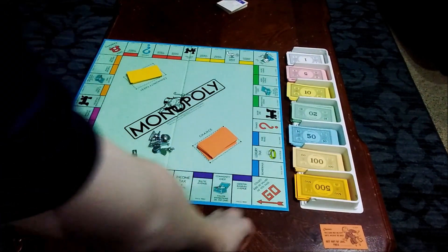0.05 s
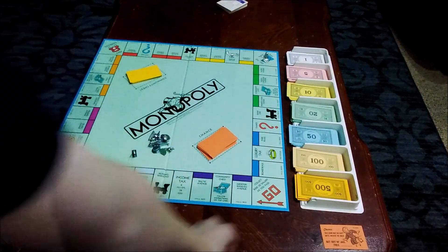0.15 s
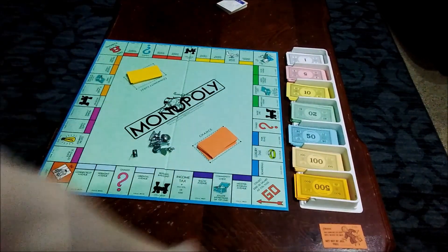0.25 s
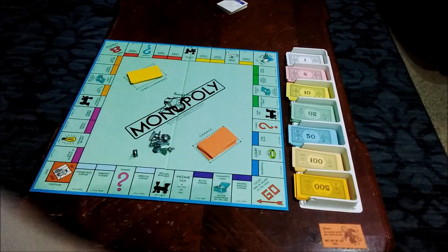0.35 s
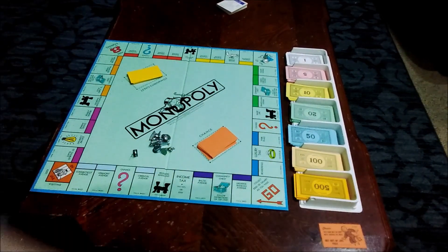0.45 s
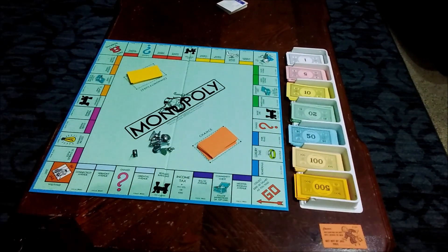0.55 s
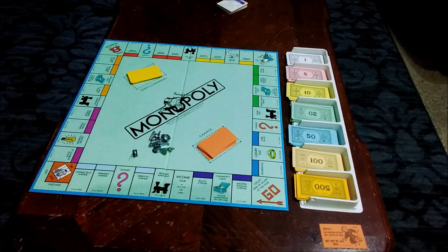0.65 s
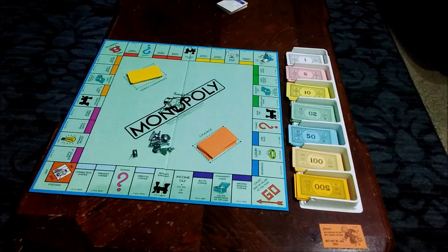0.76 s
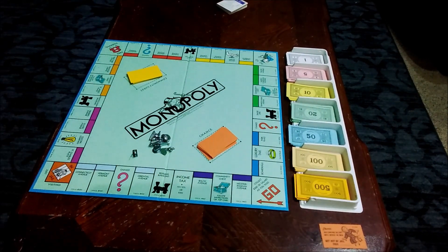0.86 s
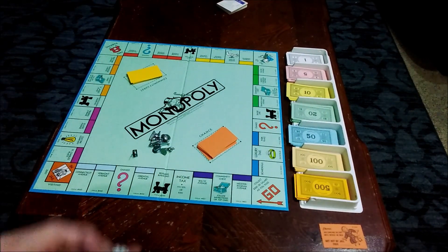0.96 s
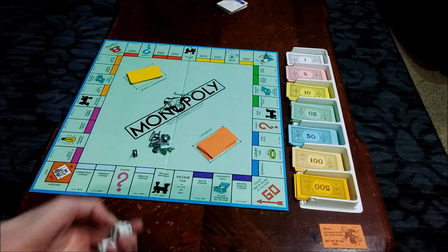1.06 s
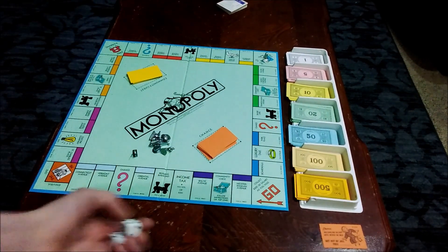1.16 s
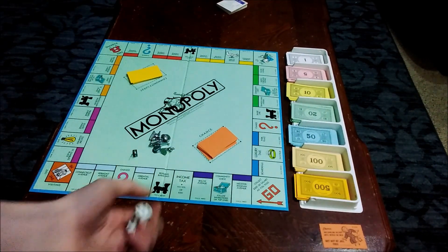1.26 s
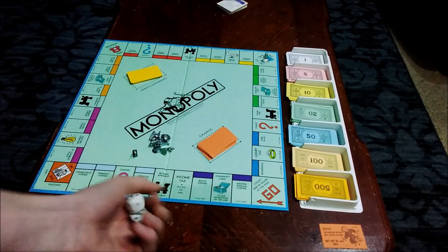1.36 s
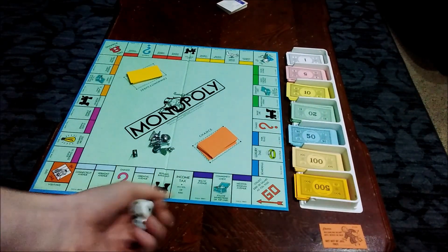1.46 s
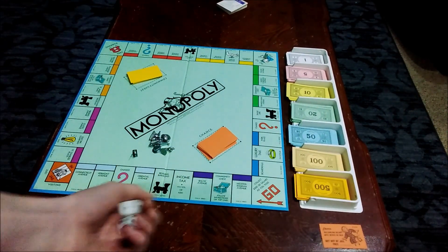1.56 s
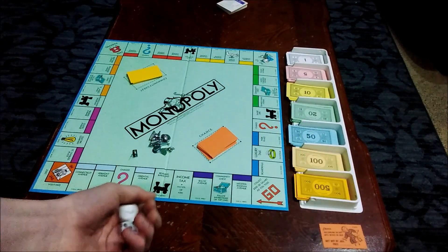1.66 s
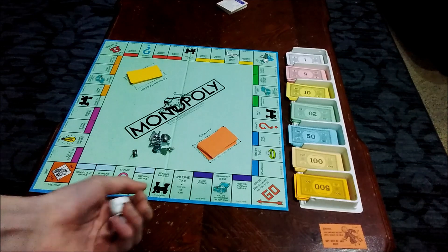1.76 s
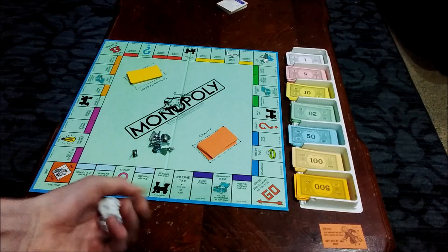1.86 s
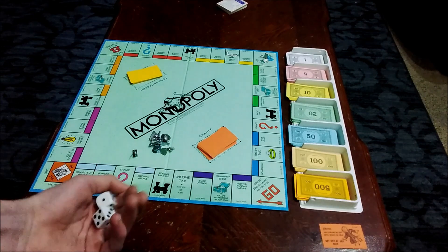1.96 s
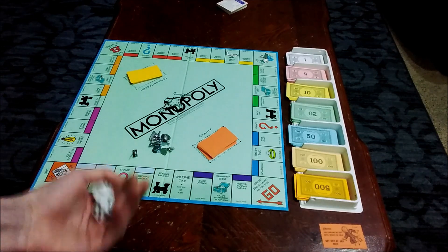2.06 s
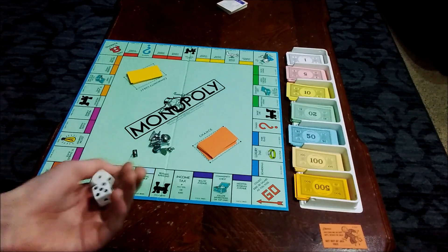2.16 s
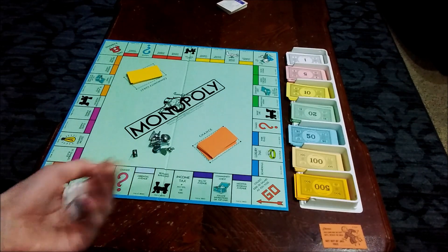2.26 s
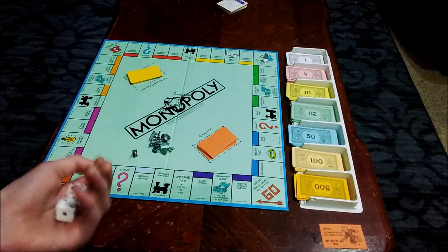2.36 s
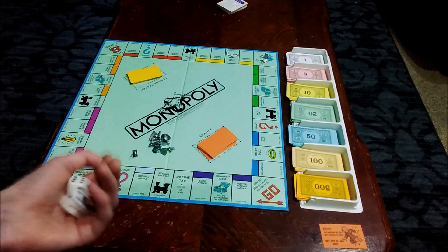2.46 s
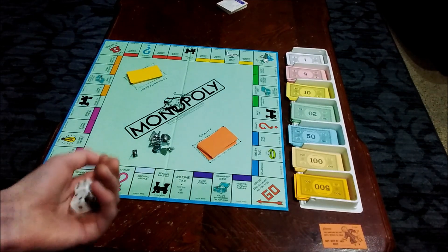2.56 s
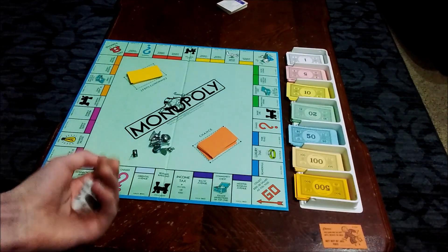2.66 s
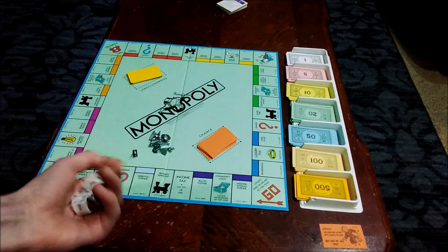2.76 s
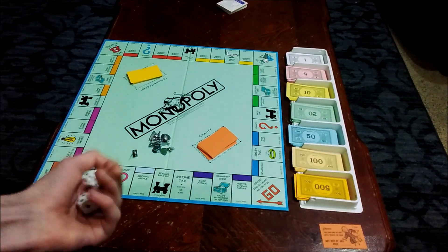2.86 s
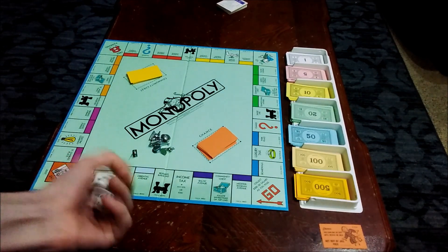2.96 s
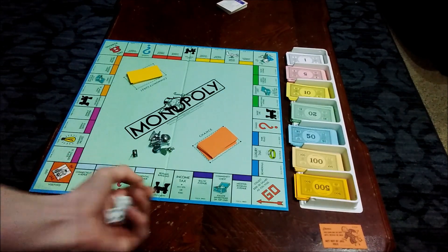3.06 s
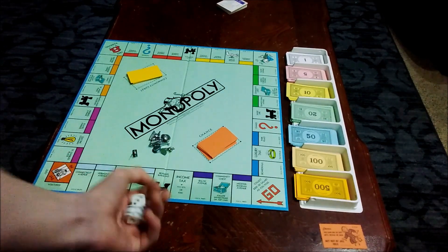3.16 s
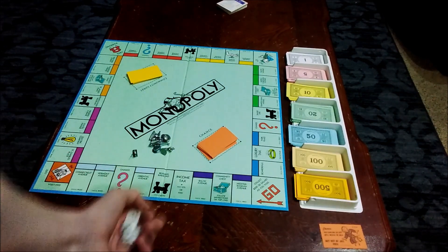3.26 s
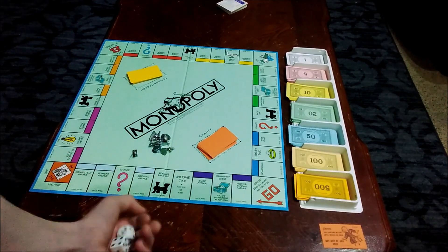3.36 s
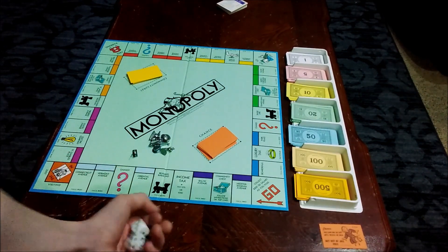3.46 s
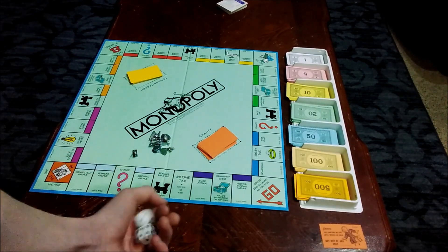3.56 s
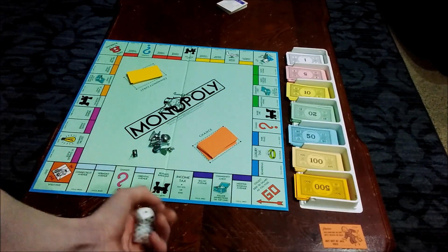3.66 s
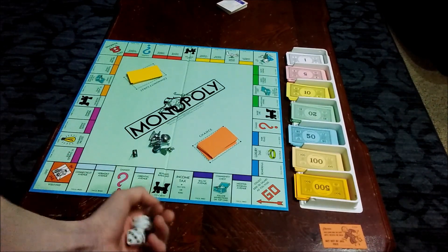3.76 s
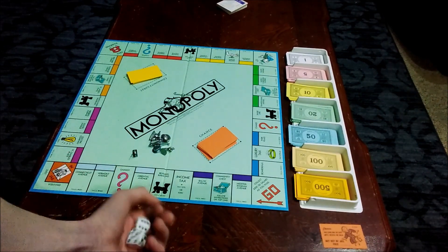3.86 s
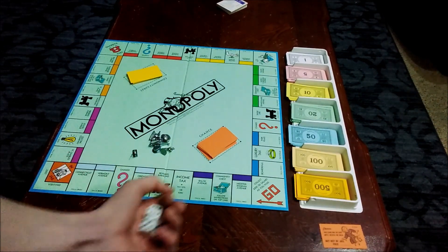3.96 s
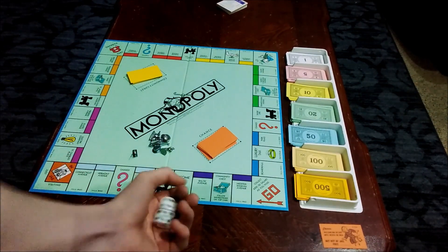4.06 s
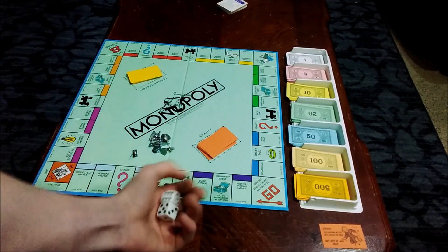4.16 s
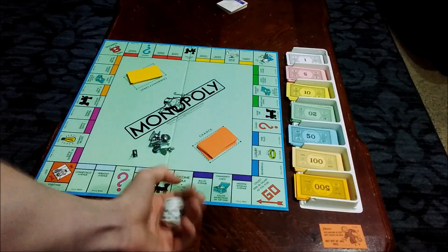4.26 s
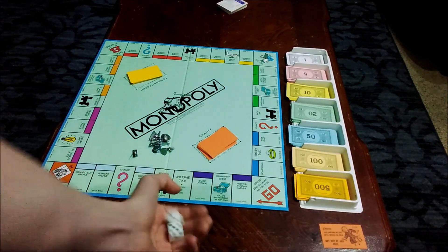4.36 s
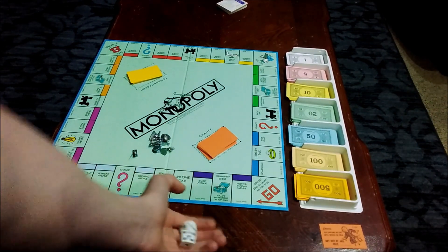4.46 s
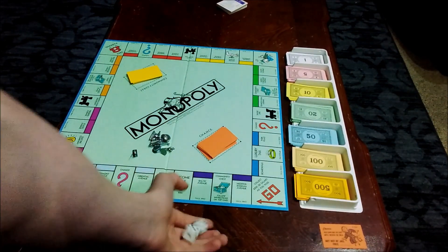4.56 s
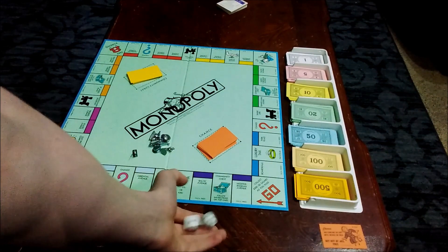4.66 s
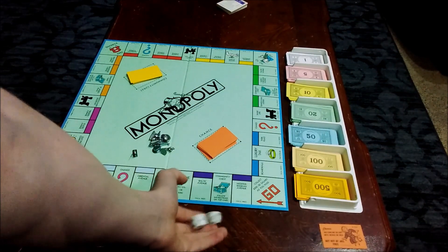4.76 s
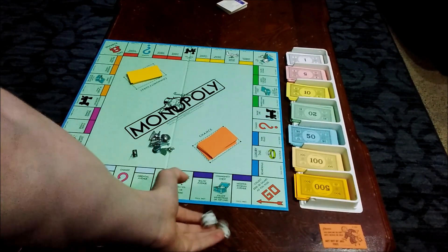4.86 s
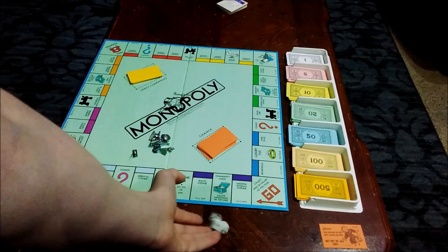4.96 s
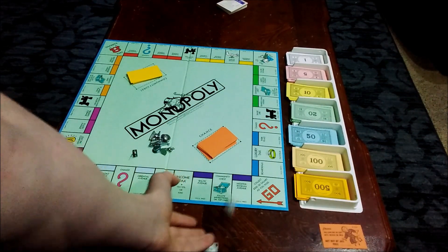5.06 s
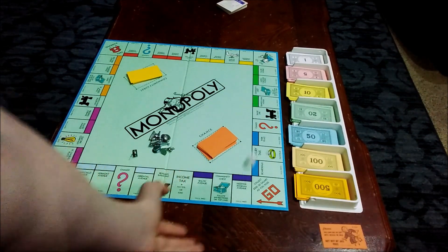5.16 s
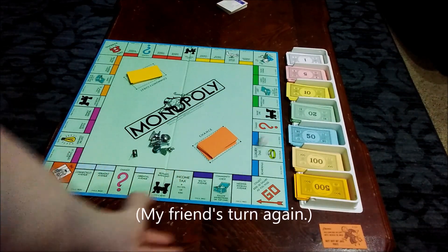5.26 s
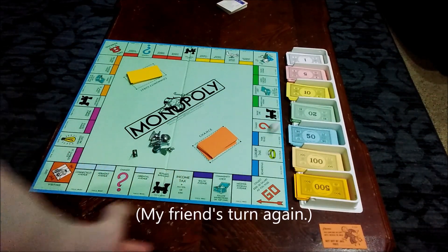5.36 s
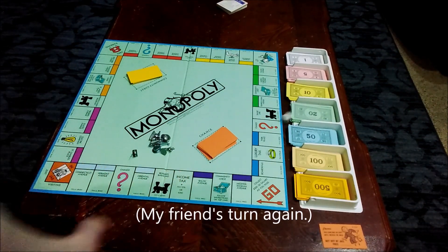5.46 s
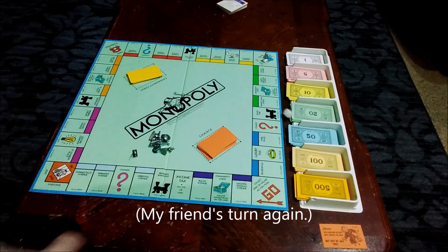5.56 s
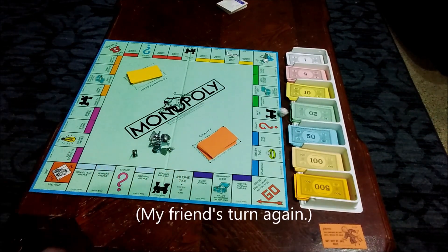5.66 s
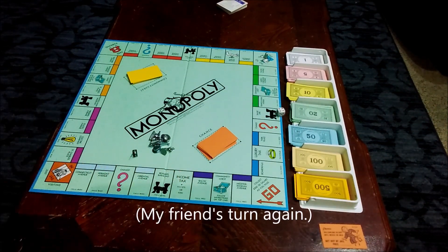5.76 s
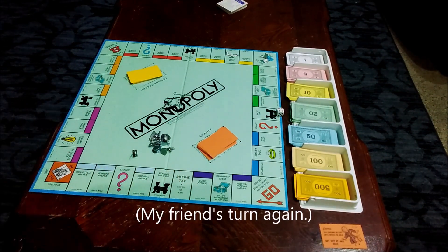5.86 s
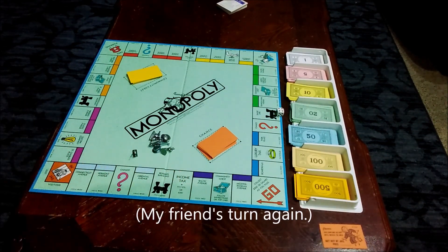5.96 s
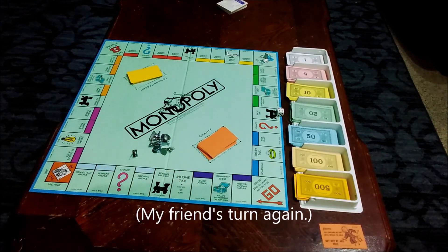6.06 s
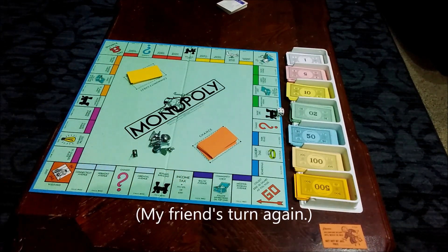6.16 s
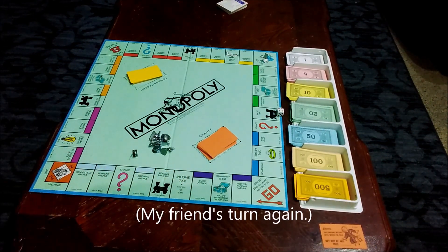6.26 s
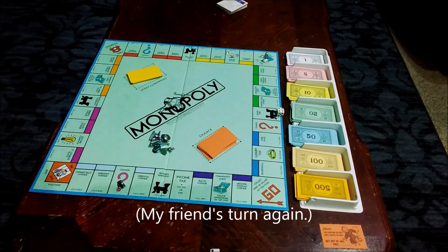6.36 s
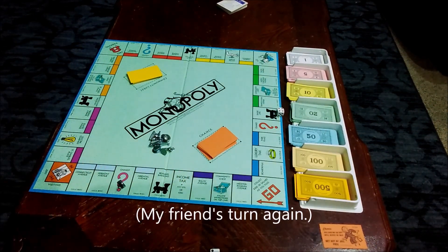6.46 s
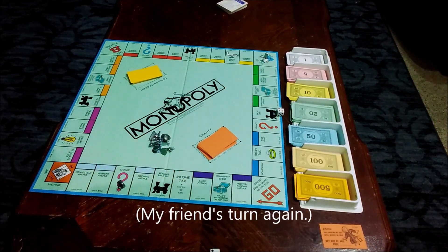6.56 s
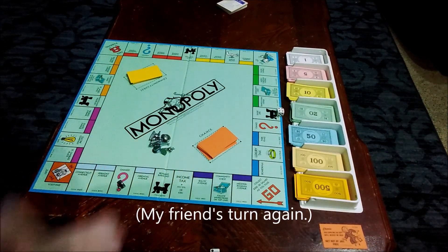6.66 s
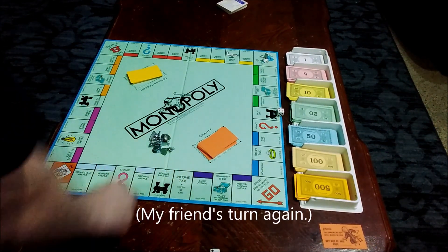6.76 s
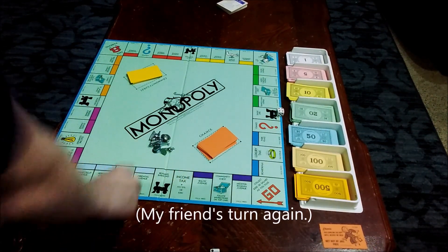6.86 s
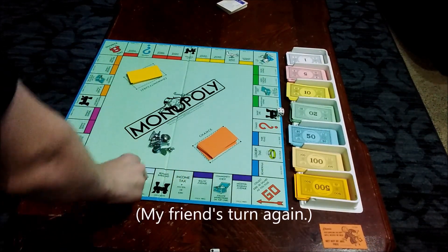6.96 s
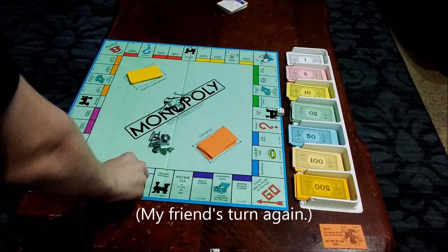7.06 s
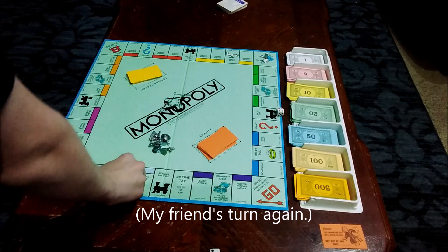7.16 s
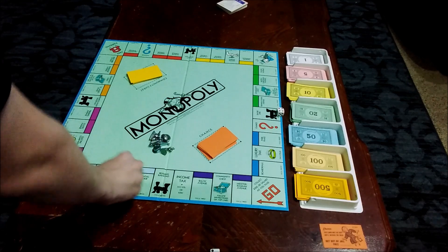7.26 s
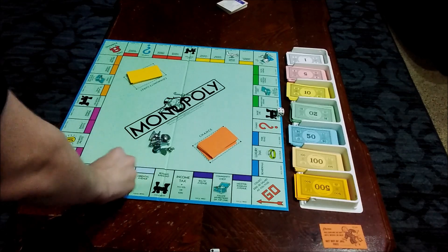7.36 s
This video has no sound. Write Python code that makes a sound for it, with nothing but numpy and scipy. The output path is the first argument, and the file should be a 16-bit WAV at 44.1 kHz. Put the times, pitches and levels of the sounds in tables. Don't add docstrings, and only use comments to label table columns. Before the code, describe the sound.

Two plastic dice click in a shaken hand, then clatter hard across a cardboard game board on a table, followed by soft taps and a faint slide.

```python
import sys
import numpy as np
from scipy import signal
from scipy.fft import rfft, irfft, next_fast_len
from scipy.io import wavfile
from scipy.ndimage import uniform_filter1d, map_coordinates

SR = 44100
rng = np.random.default_rng(int(sys.argv[2]) if len(sys.argv) > 2 else 0)


def field_ratio(decibels):
    return 10 ** (np.asarray(decibels, dtype=float) / 20)


def to_wav(sig):
    pcm = np.clip(np.atleast_2d(sig), -1, 1) * 32767
    pcm = np.round(pcm).astype(np.int16)
    wavfile.write(sys.argv[1], SR, pcm.T)


N = 327222


def add(track, start_s, sound):
    track[round(start_s * SR):][:len(sound)] += sound


def blip(hz, ms):
    u = np.arange(1024) / SR * 1000 / ms
    swell = (u * np.e / 2) ** 2 * np.exp(-u)
    return np.sin(2 * np.pi * hz * u * ms / 1000) * swell


def ring(hz, t60, rise, size=1024):
    t = np.arange(size) / SR
    return np.sin(2 * np.pi * hz * t) * field_ratio(-60 * t / t60) * (1 - np.exp(-t / rise))


def modes(table, size, spread_db):
    total = np.zeros(size)
    for k, (hz, db, t60) in enumerate(table):
        strength = field_ratio(db + spread_db * rng.standard_normal())
        pitch_hz = hz * (1 + 0.054 * rng.standard_normal())
        total += (-1) ** k * strength * ring(pitch_hz, t60, 0.000071, size)
    return total


def band(x, low_hz, high_hz):
    return signal.sosfilt(signal.butter(3, [low_hz, high_hz], "band", fs=SR, output="sos"), x)


def along(points, hz):
    point_hz, value = np.transpose(points)
    return np.interp(np.log(hz + 1), np.log(point_hz + 1), value)


def unit(x):
    return x / np.sqrt(np.mean(x ** 2) + 1e-20)


def noise(spectrum):
    size = next_fast_len(N + 8192)
    hz = np.fft.rfftfreq(size, 1 / SR)
    colour = field_ratio(along(list(spectrum) + [(15850, -120)], hz))
    return unit(irfft(rfft(rng.standard_normal(size)) * colour, size)[:N])


# start_s, level_db, board_pitch_hz, click_db, table_thump_db
BOUNCES = [(4.9367, -4.5, 1690, -9.5, -10), (4.9382, -2.5, 2330, -20.5, -18.5),
           (4.941, -6, 2060, -17.5, -19.5), (4.9982, -23, 2460, -26.5, -27),
           (5.0555, -7.5, 1780, -12, -16.5), (5.0592, -7, 2290, 4.5, -36), (5.0637, -14, 2400, 5.1, -12),
           (5.0727, -7.5, 2070, -5, -17.5), (5.0769, -10, 2650, -12, -16), (5.5088, -24.5, 1900, -24, -25),
           (5.537, -11, 1860, -16.5, -23), (5.5416, -23.5, 2080, -34, -10), (5.6417, -11, 1780, -27, -18),
           (5.6448, -25, 2230, -8.5, -29), (5.6886, -14.5, 1730, -25.5, -19),
           (5.7267, -18, 1820, -27.5, -16), (5.7904, -39, 1900, -11.5, -4)]
# start_s, level_db, click_db
TUMBLES = [(5.1124, -18.5, -14.5), (5.144, -22, -5.5), (5.1591, -22, -4), (5.1774, -17.5, -0.2),
           (5.1785, -20.5, 0.5), (5.1837, -26, -3), (5.2002, -22.5, -6), (5.2027, -20.5, -21),
           (5.2378, -19, -8.5), (5.2424, -23, -9), (5.2574, -21, -22), (5.274, -29, 0),
           (5.2901, -17.5, -22), (5.3485, -18.5, -5), (5.364, -28.5, -14), (5.3973, -36, 2.3),
           (5.401, -26.5, 2), (5.407, -21.5, -11), (5.4362, -23.5, -14), (5.4684, -25, -10),
           (5.472, -24, -33)]
# pitch_hz, level_db, fade_60db_s
BOARD_TONES = [(1050, -2, .012), (1420, -3, .014), (1820, 0, .014), (2250, 0, .014), (3100, -8, .008),
               (4000, -13, .006)]
# pitch_hz, level_db, fade_60db_s
TABLE_TONES = [(151.2, 4.5, 0.16), (222, -5.5, .15), (279, -2, 0.15), (343, 3, 0.085), (467, -2.5, 0.09),
               (600, -3.5, 0.13), (707, -13, 0.24), (905, -2, 0.038)]
EDGE_HZ, EDGE_THUMP_DB = 2210, -20.5
FACE_CLICK_HZ, EDGE_CLICK_HZ = 7600, 6600


def roll():
    out = np.zeros(N + SR)
    spread_db = 2.5
    short_table = [(hz, db, t60 * .5) for hz, db, t60 in TABLE_TONES[1:]]
    landings = [(*row, FACE_CLICK_HZ, 8) for row in BOUNCES]
    for s, db, click_db in TUMBLES:
        board_hz = EDGE_HZ * np.exp(0.18 * rng.standard_normal())
        thump_db = EDGE_THUMP_DB + 4 * rng.standard_normal()
        click_hz = EDGE_CLICK_HZ * np.exp(0.13 * rng.standard_normal())
        landings.append((s, db, board_hz, click_db, thump_db, click_hz, 1))
    for s, db, board_hz, click_db, thump_db, click_hz, clean_db in landings:
        add(out, s, field_ratio(db + thump_db - 9.5) * modes(short_table, size=4096, spread_db=spread_db))
        add(out, s, field_ratio(db - 18) * modes(BOARD_TONES, size=1024, spread_db=spread_db))
        slaps = rng.random((4, 3)) * [.006, 8, 1] + [.0008, clean_db, 0]
        chatter = rng.random((4, 3)) * [.03, 9, 1] + [.006, 14, 0]
        for late, loss_db, pitch in [(0, 0, .5), *slaps, *chatter]:
            knock = blip(board_hz * (.7 + pitch * .5), 0.14) - field_ratio(.95 * click_db - 7) * blip(4500, 0.11)
            upper = field_ratio(.25 * click_db + 1) * (.17 * blip(14500, .06) - .35 * blip(10300, .08))
            click = blip(click_hz * (.92 + .16 * pitch), .13) + upper
            click_gain = field_ratio(click_db + 0.5 - .7 * clean_db * (late > 0))
            add(out, s + late, field_ratio(db - loss_db - 1.5) * (knock + click_gain * click))
    return out[:N]


def plastic(hz):
    corner = np.exp(.06 * rng.standard_normal(2))
    low_ring = 0.22 * ring(7100 * corner[0], 0.0033, .0001)
    high_ring = 0.099 * ring(9800 * corner[1], 0.0072, .0001)
    return blip(hz, 0.055) + low_ring - high_ring


# start_s, level_db, pitch_hz, body_db
CLACKS = [(1.144, -33.5, 8100, -26), (1.174, -29, 8250, -19), (1.309, -34, 9200, -19),
          (1.481, -23.5, 8350, -13), (1.5267, -39.5, 6830, 3.5), (1.557, -30.5, 8550, -13),
          (1.599, -27.5, 7130, -12.5), (2.297, -33.5, 8300, -10), (2.3541, -30, 7540, -16),
          (2.6142, -19, 8600, -45), (2.7086, -28, 7600, -16), (2.713, -34, 6870, -30),
          (2.8603, -30, 6440, -10.5), (2.938, -30.5, 5760, -19), (2.9701, -19.5, 7550, -23),
          (3.002, -30.5, 8200, -17), (3.0409, -20.5, 8940, -20), (3.1018, -14.5, 8000, -19),
          (3.141, -22.5, 7800, -19), (3.6464, -26, 7860, -13), (3.6667, -19.5, 8650, -24),
          (3.7239, -22, 7200, -27), (3.8033, -18.5, 8560, -43), (3.8171, -19.5, 8360, -49),
          (4.1612, -45, 6750, -22), (4.2432, -34, 7800, -26), (4.3536, -30.5, 8800, -12),
          (4.298, -20.5, 8900, -49), (4.3426, -24, 8600, -26), (4.363, -30, 7160, -23)]
# start_s, level_db
MORE_HITS = [(.3473, -53), (.4643, -52.5), (1.177, -36), (1.305, -36), (1.5004, -43), (1.512, -36),
             (1.5337, -35), (1.6248, -40), (2.0924, -40), (2.18, -35), (2.2344, -40.5), (2.2477, -38.5),
             (2.2935, -36), (2.3364, -43), (2.347, -37), (2.7026, -32), (2.95, -37), (3.0134, -38),
             (3.164, -51), (3.368, -45), (3.403, -46), (3.5707, -35), (3.6791, -29.5), (3.6946, -31),
             (3.7033, -44), (3.827, -24), (4.187, -43.5), (4.32, -37), (4.3933, -32), (4.4024, -33)]
TICK_DB, TICK_HZ, HZ_PER_DB = -36.5, 6670, 67
TICK_BODY_DB, BODY_PER_DB = -19.5, -0.55
SETTLE_S, SETTLE_DB, SETTLE_SPREAD_DB = .04, -20, 15


def shake():
    out = np.zeros(N + SR)
    weak_hits = list(MORE_HITS)
    for s, db, *_ in CLACKS:
        for late, loss in rng.random((2, 2)):
            weak_hits.append((s + SETTLE_S * late, db + SETTLE_DB - SETTLE_SPREAD_DB * loss))
    hits = list(CLACKS)
    for s, db in weak_hits:
        extra_db = db - TICK_DB
        hz = TICK_HZ + HZ_PER_DB * extra_db + 600 * rng.standard_normal()
        body_db = TICK_BODY_DB + BODY_PER_DB * extra_db + 4 * rng.standard_normal()
        hits.append((s, db, hz, body_db))
    for s, db, hz, body_db in hits:
        body = blip(2900, .1)
        add(out, s, field_ratio(db + 1.45) * (plastic(hz) - field_ratio(body_db) * body))
        again_s = s + .0002 + .0004 * rng.random()
        add(out, again_s, field_ratio(db - 5.5) * plastic(hz * .9))
    return out[:N]


# start_s, level_db, push_length_ms
TAPS = [
    (5.8812, -13, 0.93),
    (6.533, -33, 0.4),
]


def taps():
    out = np.zeros(N + SR)
    for s, db, ms in TAPS:
        u = np.arange(1024) / SR / (ms * 0.00042)
        push = u * u * (1.5 - u) * np.exp(-2 * u)
        add(out, s, field_ratio(db + 17.0) * push)
        add(out, s, field_ratio(db - 21) * ms ** 2 * modes(TABLE_TONES, size=16384, spread_db=1))
    return out[:N]


# middle_s, half_length_s, level_db
SCUFFS = [
    (0.045, 0.092, -71.5),
    (7.186, 0.0042, -62),
    (7.205, 0.0076, -53.5),
    (7.23, 0.0098, -63.5),
    (7.268, 0.027, -74),
]
# pitch_hz, level_db_per_hz
SCUFF_COLOUR = [(500, -37), (1000, -2.5), (1600, 2), (2300, -1.5), (3200, -25), (6000, -48)]


def slides():
    t = np.arange(N) / SR
    puffs = sum(field_ratio(db) * np.exp(-((t - s) / half_s) ** 2) for s, half_s, db in SCUFFS)
    return noise(SCUFF_COLOUR) * puffs


# delay_s, level_db
ECHOES = [(.0012, -13), (.0117, -12), (.0129, -19), (.0212, -22), (.0325, -26)]
# pitch_hz, fade_60db_s
ROOM_FADE = [(150, 0.52), (500, 0.53), (2000, 0.49), (5000, 0.59), (8000, 0.36), (14000, .18)]


def room(x, tail_db, low_hz):
    out = x + sum(field_ratio(db) * np.pad(x, (round(s * SR), 0))[:N] for s, db in ECHOES)
    x = band(x, low_hz, 16000)
    moment = np.arange(N) / 2200
    for k in range(5):
        share = np.clip(1 - abs((moment - k + 2.5) % 5 - 2.5), 0, 1)
        hz, t, z = signal.stft(rng.standard_normal(SR // 2), SR, nperseg=256)
        fade = field_ratio(-60 * t / along(ROOM_FADE, hz)[:, None])
        tail = signal.istft(z * fade, SR, nperseg=256)[1]
        tail = tail * (1 - np.exp(-np.arange(len(tail)) / SR / 0.003))
        out = out + field_ratio(tail_db) * signal.fftconvolve(x * share, tail / np.linalg.norm(tail))[:N]
    return out


# pitch_hz, level_db_per_hz
RUMBLE = [(8.8, -35), (15, 1.5), (123, -13.5), (240, -17), (570, -22), (1500, -31.5), (1950, -67),
          (3300, -120)]
# pitch_hz, level_db_per_hz
HISS = [(590, -40), (1000, -5.5), (1520, -5), (1890, -2.5), (2310, -5), (4890, -8.5), (15750, -9)]
# pitch_hz, level_over_rumble_db
HUM = [(120, -4.5), (238, -14.5)]
# time_s, level_db
FADE_IN = [(0, -7.5), (.2, -8), (.47, -3.5), (.72, -1.2), (1.38, 0)]
RUMBLE_DB, HISS_DB = -59.5, -67


def background():
    t = np.arange(N) / SR
    drift = map_coordinates(rng.standard_normal((2, 200)), [[0 * t, 0 * t + 1], [t * 14, t * 14]])
    hum = sum(field_ratio(db + 2 * d) * np.sin(2 * np.pi * hz * t + .5 * d) for (hz, db), d in zip(HUM, drift))
    whine = field_ratio(-17) * np.sin(2 * np.pi * 15734 * t + .3 * drift[0])
    low = field_ratio(RUMBLE_DB) * (noise(RUMBLE) + hum)
    high = field_ratio(HISS_DB) * (noise(HISS) + whine)
    return field_ratio(np.interp(t, *np.transpose(FADE_IN))) * (low + high)


def scene():
    board = room(band(band(roll(), low_hz=120, high_hz=16000), low_hz=130, high_hz=16000), tail_db=-4.5, low_hz=120)
    hand = room(band(shake(), low_hz=1500, high_hz=12900), tail_db=-7.0, low_hz=3690)
    table = room(band(taps() + slides(), low_hz=94, high_hz=3600), tail_db=-9.5, low_hz=80)
    return (hand + board + table + background())[None]


# middle_s, lowest_pitch_hz, step_over_local_level_db
BLURS = [(.046, 3040, 9), (.133, 3000, 10), (.148, 3050, 11), (.218, 2520, 3), (.935, 2000, 6),
         (1.05, 2110, 10), (1.596, 700, 9), (1.648, 1500, 4.5), (1.69, 1000, 6), (1.861, 810, 5),
         (2.094, 500, 7), (2.179, 1500, 8.5), (2.5, 1500, 7), (3.568, 1500, 9), (3.781, 1500, 10),
         (4.08, 2060, 4.5), (4.41, 1000, 4), (4.809, 1980, 4.5), (5.166, 4020, 3), (5.256, 4970, 5.5),
         (5.363, 6500, 8), (5.511, 5000, 6), (6.49, 1980, 9.5), (6.65, 2020, 4), (6.89, 1986, -0.5),
         (7.213, 2800, 3)]


def blur(x):
    out, size = x.copy(), 2048
    window = signal.windows.kaiser_bessel_derived(size, 4 * np.pi)
    hz = np.fft.rfftfreq(size, 1 / SR)
    for s, low_hz, step_db in BLURS:
        at = slice(round(s * SR) - size // 2, round(s * SR) + size // 2)
        z = rfft(out[at] * window)
        bands_db = np.repeat(rng.normal(0, 2.5, 65), 16)[:len(z)]
        step = field_ratio(step_db + bands_db) * uniform_filter1d(abs(z), size=140)
        coarse = z / (abs(z) + 1e-12) * step * np.floor(abs(z) / step + 0.41)
        out[at] += window * irfft((coarse - z) * (hz > low_hz))
    return out


def roll_off(x):
    return signal.sosfilt(signal.butter(12, 16950, fs=SR, output="sos"), x)


# start_s, end_s
DROPOUT = (6.378, 6.411)


def record(dry):
    t = np.arange(N) / SR
    gate = np.where((t > DROPOUT[0]) & (t < DROPOUT[1]), field_ratio(-34.0), 1)
    top = .95
    soft = np.tanh(dry[0] / top) * top
    treble_limit = signal.butter(12, 16300, fs=SR, output="sos")
    mix = blur(signal.sosfilt(treble_limit, soft))[None] * gate
    return roll_off(mix)


dry = scene()
out = record(dry)
to_wav(out)
```